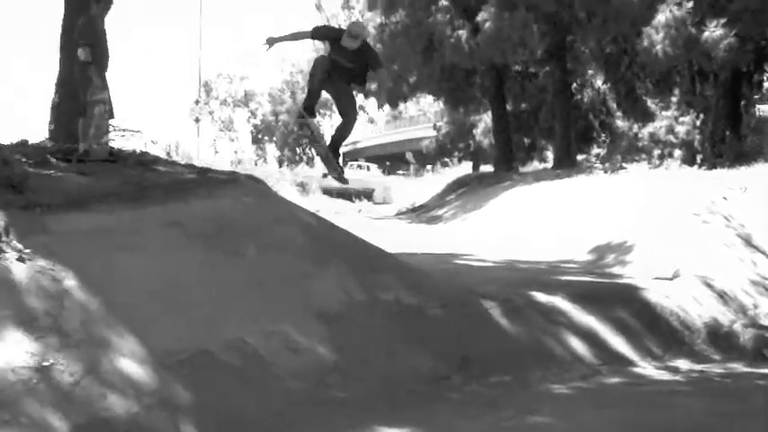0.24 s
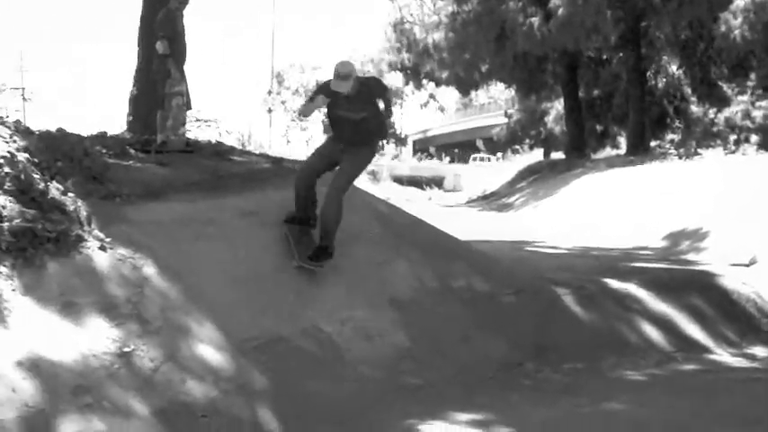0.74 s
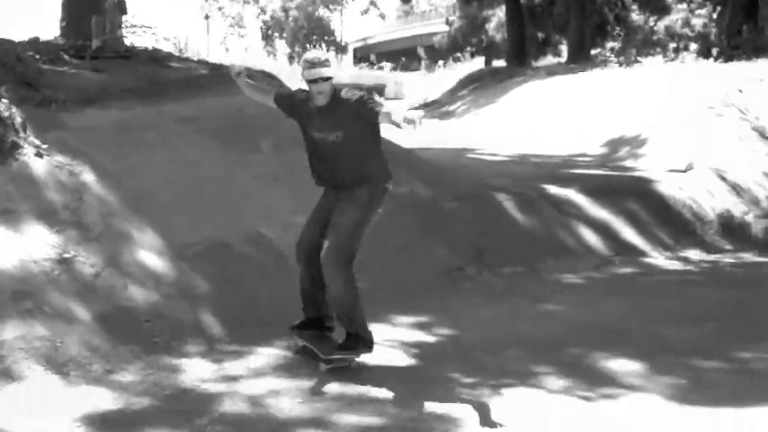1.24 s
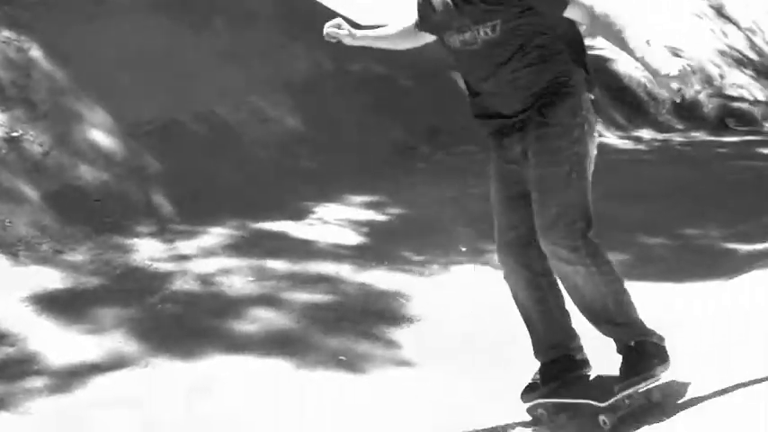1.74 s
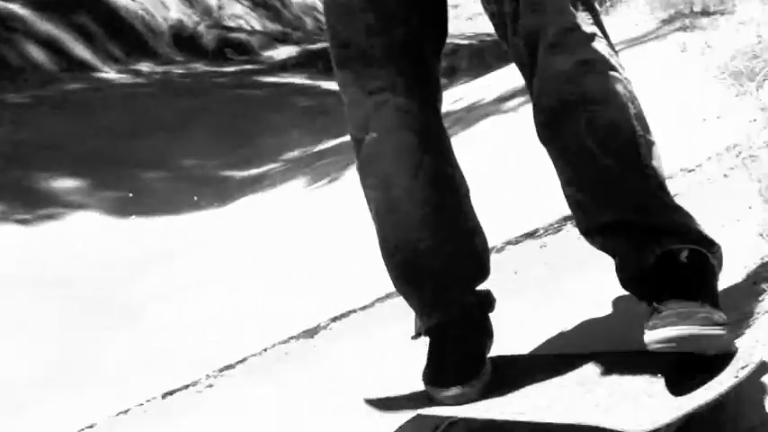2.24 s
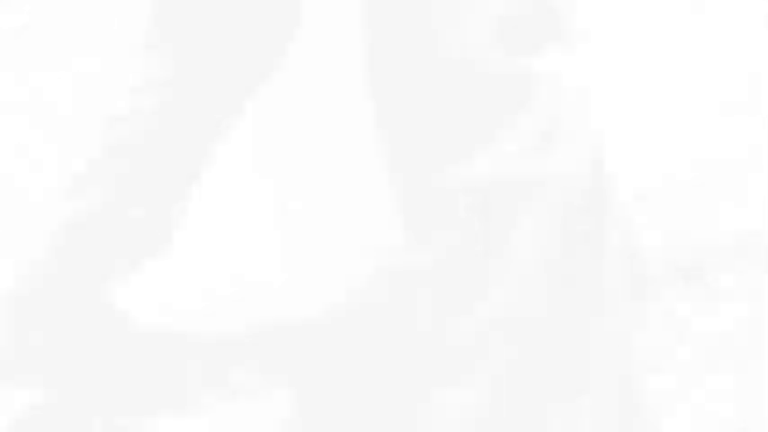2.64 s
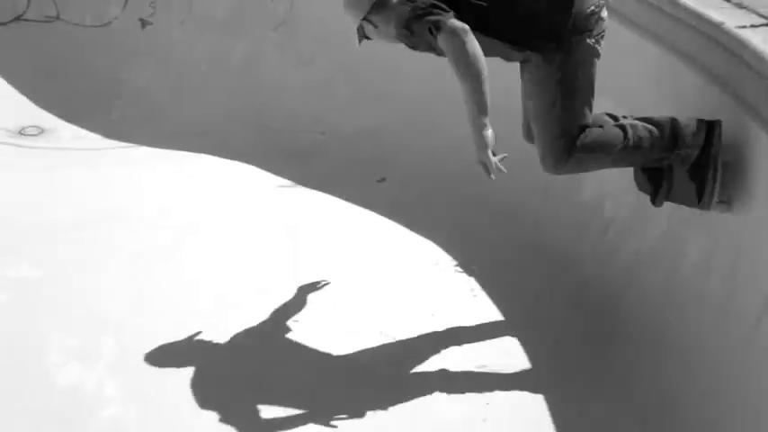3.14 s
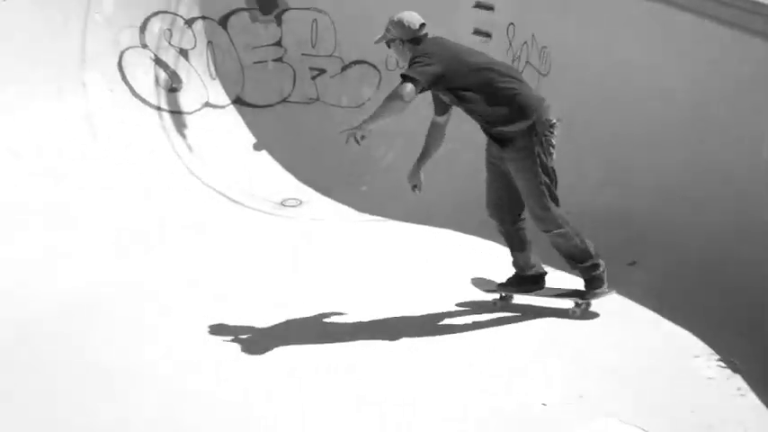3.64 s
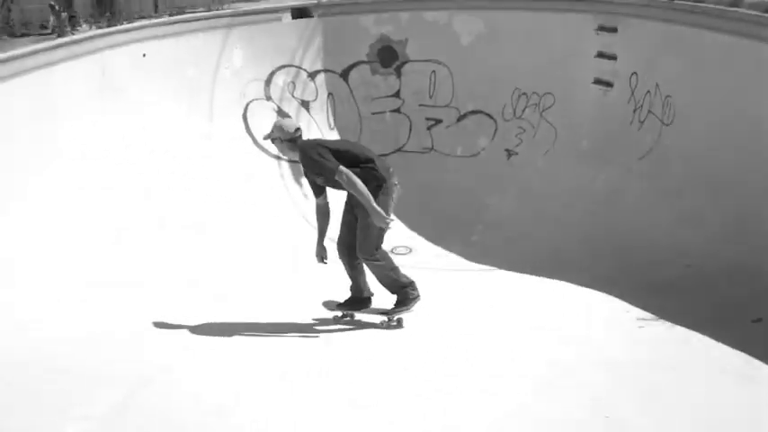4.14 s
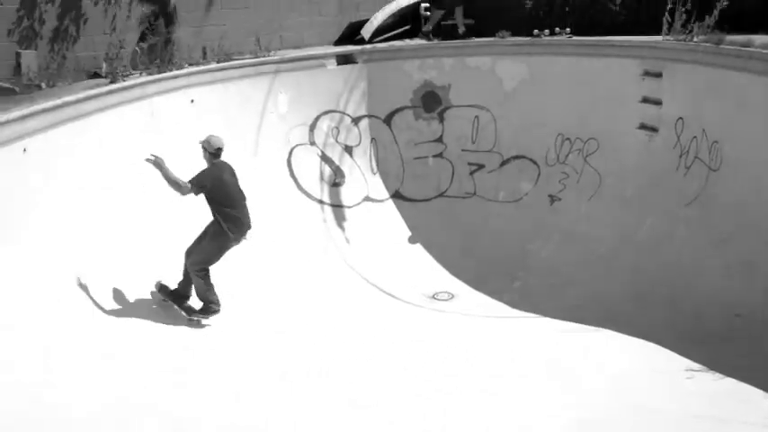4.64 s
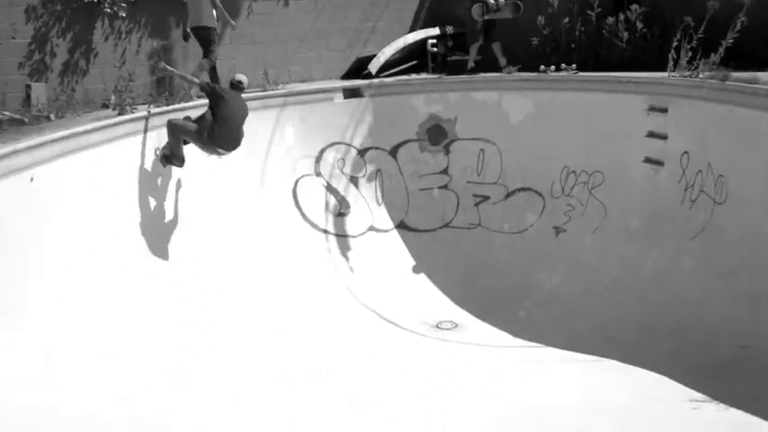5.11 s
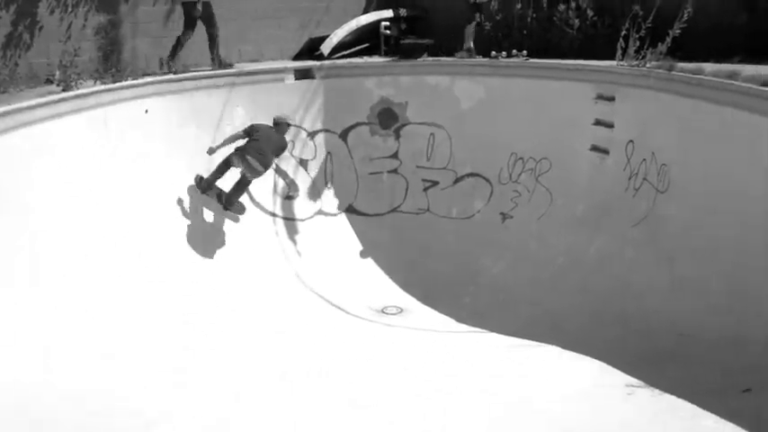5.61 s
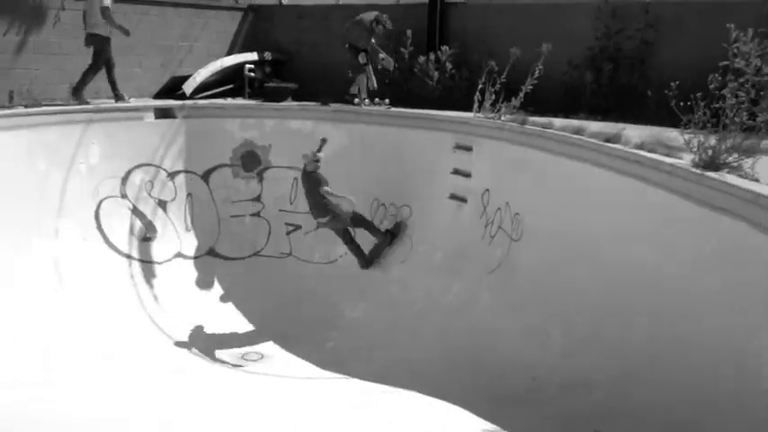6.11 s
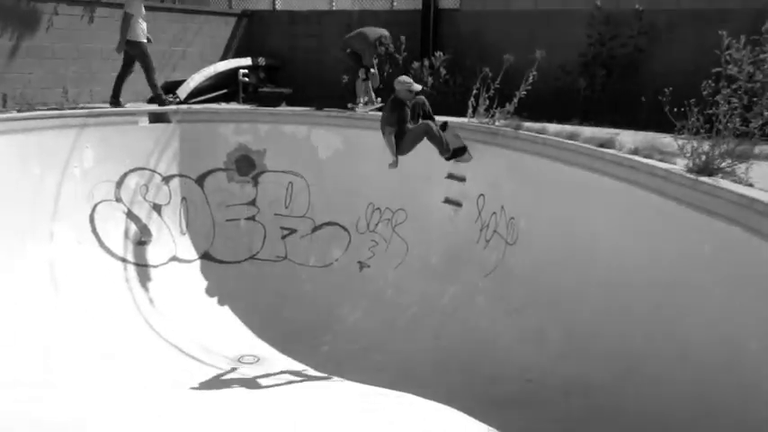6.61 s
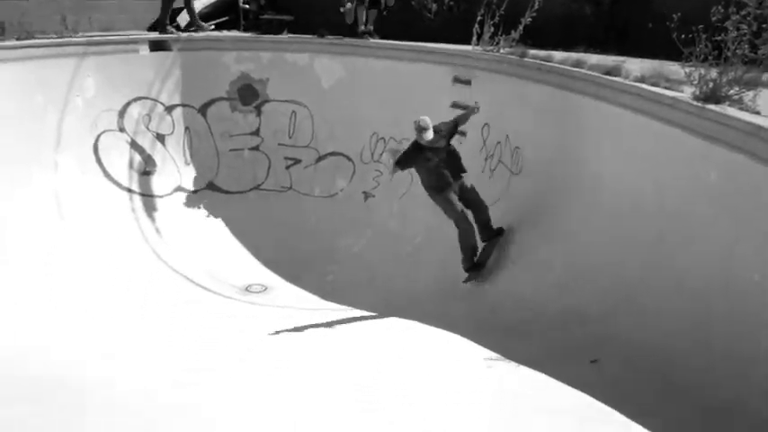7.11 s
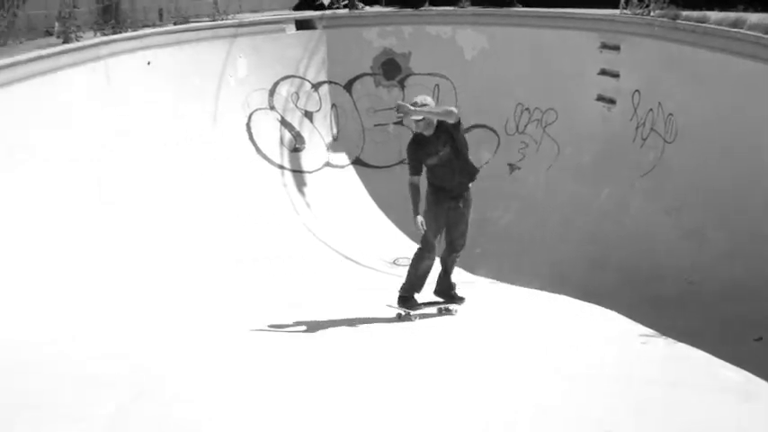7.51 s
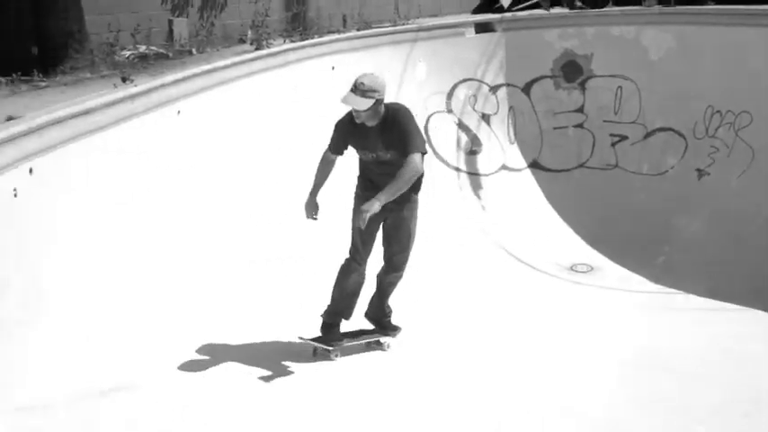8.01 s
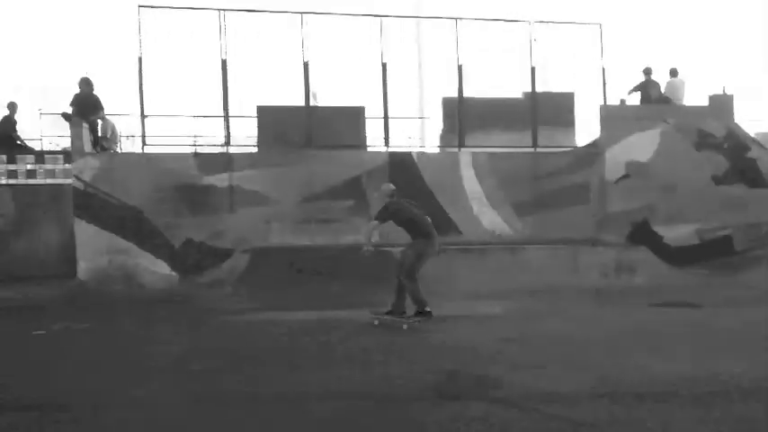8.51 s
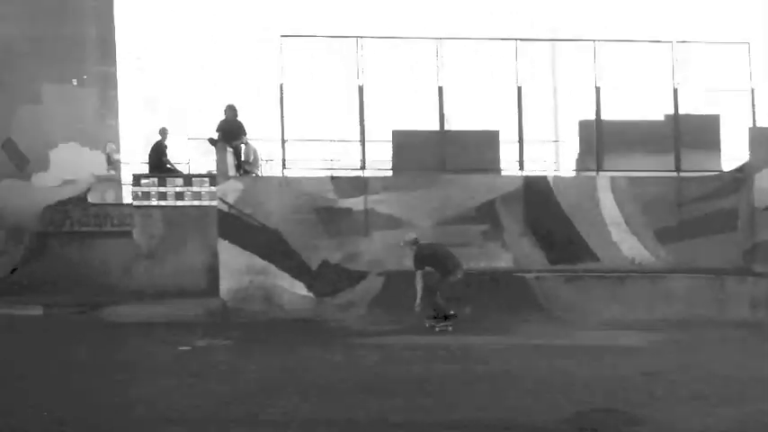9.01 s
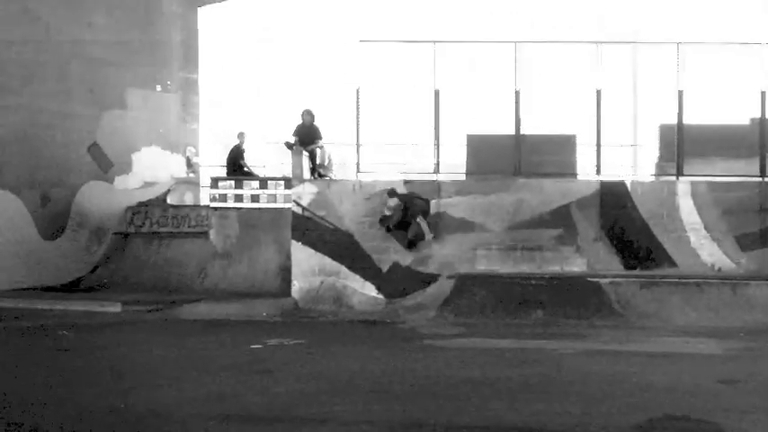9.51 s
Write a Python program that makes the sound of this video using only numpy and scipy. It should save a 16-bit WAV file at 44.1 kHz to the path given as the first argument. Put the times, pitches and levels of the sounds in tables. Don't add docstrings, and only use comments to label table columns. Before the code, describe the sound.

Close, wide stereo outdoor sound of hard wheels on concrete. First a coarse rumble with grit hiss, low wind buffeting, a loud wooden pop and clacks over seams. After a momentary dropout, a smooth hollow bowl roll surges and sings, with chattering taps, slide scrapes, a hushed float and a sharp landing. Finally the rolling turns dull and distant over open ground, with taps and a paired knock.

```python
import sys
import numpy as np
from scipy import signal
from scipy.fft import rfft, irfft, next_fast_len
from scipy.io import wavfile
from scipy.ndimage import map_coordinates

SR = 44100
rng = np.random.default_rng(int(sys.argv[2]) if len(sys.argv) > 2 else 0)


def bounce(signal):
    frames = np.transpose(np.atleast_2d(signal))
    limited = np.clip(frames, -1, 1)
    pcm = np.round(limited * 32767).astype(np.int16)
    wavfile.write(sys.argv[1], SR, pcm)


def volts(x):
    e = np.asarray(x, float) / 20
    return 10 ** e


N = 429975
STEPS = np.arange(0, N, 64)
LAYER_EDGES_HZ = 400, 950, 2600, 5300, 10000


def table(rows):
    s, *columns = np.transpose(rows)
    return np.array([np.interp(np.arange(N) / SR, s, c) for c in columns])


def fine(coarse):
    return np.interp(np.arange(N), STEPS, coarse)


def at_hz(points, hz):
    points_hz, values = np.transpose(points)
    return np.interp(np.log(hz), np.log(points_hz), values)


def rms_one(x):
    return x / np.sqrt(np.mean(x ** 2) + 1e-20)


def drift(rate_hz):
    r = np.exp(-40 * np.pi * rate_hz / SR)
    noise = rng.standard_normal(N // 20 + 4002)
    slow = signal.lfilter([1], [1, -2 * r, r * r], noise)[4000:]
    return np.interp(STEPS / 20, np.arange(len(slow)), rms_one(slow))


def swell(t, s, length_s):
    return np.exp(-((t - s) / (length_s / 2)) ** 2)


def ring(x, hz, t60_s):
    r, w = volts(-60 / (t60_s * SR)), 2 * np.pi * hz / SR
    return signal.lfilter([0, np.sin(w)], [1, -2 * r * np.cos(w), r * r], x)


def pair(mid, side, hz):
    # pitch in Hz, left-right likeness from 0 to 1.
    likeness = [(60, 0.79), (130, 1), (400, 0.97), (1000, 0.63), (2000, 0.045), (4000, 0.31), (7000, 0.049),
                (14000, 0.051)]
    alike = np.clip(at_hz(likeness, hz), 0, 1)
    return np.sqrt(.5 + alike / 2) * mid + np.sqrt(.5 - alike / 2) * side * [[1], [-1]]


def grounds():
    t = STEPS / SR
    yard_step_s = 8.6, 8.01
    yard = np.interp(t, yard_step_s, [0, 1])
    bank = t < 2.35
    return np.array([bank, (1 - yard) * ~bank, yard])


def parts_db():
    # start in seconds, deck load in dB, truck chatter in dB, nearness in dB.
    ride = [(0, -28, -33.5, -24.5), (.54, -28, -31, -24), (.95, -30.5, -35, -13.5),
            (1.27, -36.5, -32.5, 0.5), (2.1, -39, -32, 6.5), (2.46, -26.5, -30.5, -1.5),
            (2.8, -35, -37.5, 10.5), (3.1, -28, -26.5, -5.5), (3.55, -32.5, -32, 2), (3.9, -30.5, -39, -3),
            (4.3, -33.5, -36.5, -6), (5.1, -28, -36, -2), (5.8, -19, -28, -10), (6.3, -19.5, -28.5, -10),
            (7.1, -29.5, -34.5, -4.5), (7.7, -35, -38, -1.5), (8.0, -23.5, -34, -7.5),
            (9.75, -25.5, -34.5, -5.5)]
    parts = [(250, 1, 0.086, 1, 0.4), (600, 0.75, 0.36, 0.14, 0.74), (1500, 0.049, 1.08, 0.081, 0.76),
             (3700, 0.091, 1.44, 0.06, 0.51), (7500, 0.066, 0.98, 0.26, 0.47),
             (12000, 0.3, 1.03, 0.52, 0.58)]
    balance_db = [(-30, -39, -37, -47, -49.5, -45.5), (-31.5, -38, -37, -46, -46, -48.5),
                  (-29, -34.5, -35, -45, -47, -52.5)]
    # centre in seconds, length in seconds, deck gain in dB,
    # deck pitch in Hz, grit gain in dB.
    pumps = [(0.03, 0.29, 5, 250, 3.5), (1.103, 0.25, 2, 403, 1), (1.55, 0.56, -4.5, 1110, -2.5),
             (1.693, 0.17, 16, 570, 7.5), (1.846, 0.13, 4, 400, 1.5), (2.302, 0.15, 9, 330, 8),
             (2.558, 0.2, -13, 1500, -7), (2.932, 0.17, 9, 460, 4), (3.213, 0.3, -8, 1500, -2),
             (3.382, 0.08, 7, 810, 6), (4.136, 0.11, 5, 1310, 6.5), (4.562, 0.65, 9, 250, 2),
             (4.72, 0.048, 1.5, 250, 3), (4.845, 0.16, 8.5, 566, 7.5), (4.988, 0.18, 12.5, 1320, 11.5),
             (5.204, 0.11, 4.5, 910, 7.5), (5.277, 0.069, 7.5, 925, 11), (5.827, 0.11, 4.5, 1400, 4.5),
             (6.138, 0.12, 2.5, 450, 3.5), (6.414, 0.0084, 5, 900, 9.5), (6.97, 0.11, 14.5, 950, 14),
             (7.362, 0.22, 9.5, 605, 4.5), (8.485, 1, 2, 400, 2.5), (9.446, 0.45, 2.5, 250, 0.5)]
    # start in seconds, length in seconds, level in dB.
    lifts = [
        (0.634, 0.17, -8),
        (1.292, 0.14, -4),
        (5.308, 0.2, -6.5),
        (5.561, 0.092, -2),
        (6.39, 0.57, -15.5),
        (6.614, 0.31, -3),
        (1.418, 0.039, -3),
        (1.735, 0.03, -6),
        (1.785, 0.06, -6.5),
        (1.84, 0.042, -5),
    ]
    mean_load_db, pump_octaves, lift_edge_s = -33, 1.38, 0.03
    hz, *follows, hush = np.transpose(parts)
    t = STEPS / SR
    controls = table(ride) - [[mean_load_db], [mean_load_db], [0]]
    db = np.transpose(balance_db) @ grounds() + np.transpose(follows) @ controls[:, STEPS]
    for s, length_s, deck_db, deck_hz, grit_db in pumps:
        reach_db = deck_db * np.exp(-(np.log2(hz / deck_hz) / pump_octaves) ** 2)
        gain_db = np.where(hz < LAYER_EDGES_HZ[2], reach_db, grit_db)
        db += gain_db[:, None] * swell(t, s, length_s)
    for s, length_s, lift_db in lifts:
        end_s = max(length_s, lift_edge_s)
        corners_s = s + np.array([0, lift_edge_s, end_s, end_s + lift_edge_s])
        db += lift_db * hush[:, None] * np.interp(t, corners_s, [0, 1, 1, 0])
    return db


def rolling():
    # pitch in Hz, density in dB per Hz.
    bank_colour = [(130, -10.5), (220, -6), (330, -9.5), (480, -11.5), (1000, -11), (1900, -11.5),
                   (3300, -28.5), (4500, -32), (6000, -29.5), (9000, -29), (13000, -22)]
    bowl_colour = [(130, -5.5), (220, -1.5), (480, -7.5), (1000, -10), (1400, -8.5), (2200, -23),
                   (2700, -25), (3800, -34.5), (5500, -18), (7000, -16.5), (9000, -14), (13000, -18)]
    yard_colour = [(130, -16), (220, -1.5), (480, -9), (700, -9.5), (1000, -28.5), (1900, -32.5),
                   (3300, -27), (4500, -33.5), (6000, -27), (7500, -26), (13000, -37)]
    # pitch in Hz, width in Hz, level in dB.
    deck_rings = [
        [(318, 70, -6), (1054, 240, -3), (1783, 12, -14)],
        [(437, 30, -7.5), (645, 86, -5.5), (500, 84, -8), (1644, 230, -6)],
        [(505.7, 27, -6), (1290, 19, -12), (1712, 40, -12), (2620, 60, -40)],
    ]
    pebbles_per_s = 260, 120, 120
    pebbles_db = -2, -7, -16
    flutter = 1, .9, .5
    layers = volts(parts_db())
    share = grounds()
    bumps = 1.1 * drift(70) + .9 * drift(16)
    uneven = flutter @ share

    edges_hz = 75.6 * 2 ** (np.arange(24) / 3)
    centres_hz = np.sqrt(edges_hz[1:] * edges_hz[:-1])
    layer = np.searchsorted(LAYER_EDGES_HZ, centres_hz)
    colours = bank_colour, bowl_colour, yard_colour
    power = np.array([volts(2 * at_hz(c, centres_hz)) * centres_hz for c in colours])
    power /= np.array([power[:, layer == k].sum(axis=1) for k in layer]).T

    white = rng.standard_normal((2, 2, N))
    struck = rng.random(N) < fine(pebbles_per_s @ share * volts(4 * drift(12))) / SR
    sizes = volts(4 * np.minimum(rng.exponential(1, N), 3)) * rng.choice([-1, 1], N)
    white[:, 0] += rms_one(struck * sizes) * fine(volts(pebbles_db) @ share)

    out = np.zeros((2, N))
    for k, hz in enumerate(centres_hz):
        band = signal.butter(2, edges_hz[k:k + 2], "band", fs=SR, output="sos")
        mid, side = rms_one(signal.sosfilt(band, white[k % 2]))
        flicker = volts(uneven * (bumps + 2.0 * drift(8.7)))
        gain = np.sqrt(power[:, k] @ share) * layers[layer[k]] * flicker
        out += fine(gain) * pair(mid, side, hz)
    for modes, here in zip(deck_rings, share):
        for hz, width_hz, db in modes:
            mid, side = rms_one(ring(rng.standard_normal((2, N)), hz, 1.63 / width_hz))
            spells = volts(db + uneven * 3.2 * drift(18.4))
            gain = here * layers[np.searchsorted(LAYER_EDGES_HZ, hz)] * spells
            out += fine(gain) * pair(mid, side, hz)
    return out


def wind():
    # centre in seconds, length in seconds, level in dB.
    gusts = [(0, 0.22, -28), (0.256, 0.14, -41), (0.747, .2, -37), (0.456, 0.35, -34.5),
             (1.15, 0.21, -26.5), (3.2, 2.2, -48), (4.076, 0.25, -29.5), (4.45, 0.41, -31.5),
             (4.7, 0.36, -30.5), (5.85, 0.44, -50), (6.97, 0.17, -24.5), (8.397, .7, -35),
             (9.11, 0.93, -33)]
    # start in seconds, peak in dB, port (positive = left).
    puffs = [
        (0.313, -11, 1),
        (0.412, -3.5, 1),
        (0.446, 1, -1),
        (.482, -34, 1),
        (0.493, 1, -1),
        (0.531, -15, 1),
    ]
    calm_db, air_db = -48, -69
    lumps = rng.standard_normal((2, N)) * [fine(volts(4.5 * drift(10))), fine(volts(4.5 * drift(10)))]
    lumps += 0.68 * lumps[::-1]
    low = signal.butter(2, [105, 230], "band", fs=SR, output="sos")
    strength = volts(calm_db) + sum(volts(db) * swell(STEPS / SR, s, length_s) for s, length_s, db in gusts)
    out = fine(strength) * rms_one(signal.sosfilt(low, lumps))
    out += volts(air_db) * np.diff(rng.standard_normal((2, N + 1)))
    t = np.arange(1300) / SR
    puff = np.sin(2 * np.pi * 170 * t) * t / 0.0068 * np.exp(1 - t / 0.002)
    for s, db, port in puffs:
        out[int(port < 0), round(s * SR):][:1300] += volts(db) * puff
    return out


def blows(rows, rattle_s, first):
    # pitch in Hz, level in dB, t60 in seconds.
    axles = [
        (3500, 10, 0.032),
        (4000, 16.5, 0.016),
        (4280, 1, 0.011),
        (6960, 9.5, 0.018),
        (7790, 13, 0.024),
    ]
    board_hz = np.geomspace(210, 2900, 18)
    board_t60_s = .027 * (1000 / board_hz) ** .3
    focus_db, focus_t60_s = 4, .018
    soft_contact_s = .0003
    size = 2600
    out = np.zeros((2, N + size))
    t = np.arange(size) / SR
    air = signal.butter(2, [2400, 15000], "band", fs=SR, output="sos")
    envelope = np.exp(-(t / rattle_s) ** 3) * np.minimum(1, .6 + t / (.3 * rattle_s))
    give = np.hanning(round(soft_contact_s * SR) + 2)
    for s, db, crack_db, loudest_hz in rows:
        hits = rng.random((2, size)) < 3000 / SR
        contacts = hits * rng.standard_normal((2, size)) * envelope
        contacts[:, 20] = first, first * rng.uniform(-.6, .6)
        soft = signal.lfilter(give, 1, contacts)
        strength_db = -7.5 * np.abs(np.log2(board_hz / loudest_hz)) - 2 * np.log2(board_hz / 1100) ** 2
        board = [*zip(board_hz, strength_db, board_t60_s), (loudest_hz, focus_db, focus_t60_s)]
        sound = np.zeros((2, size))
        for modes, part_db, push in (board, -3.0, soft), (axles, crack_db - 7.0, contacts):
            part = np.zeros((2, size))
            for hz, mode_db, t60_s in modes:
                gain = volts(mode_db + 2 * rng.standard_normal())
                mid, side = ring(push + 1e-18, hz * rng.uniform(0.94, 1.05), t60_s)
                part += gain * pair(mid, side, hz)
            sound += volts(part_db) * part / np.abs(part).max()
        grit = signal.sosfilt(air, rng.standard_normal((2, size))) * envelope
        grit = signal.lfilter([1], [1, -.75], pair(*grit, 4000))
        at = round(s * SR)
        out[:, at:at + size] += volts(db) * (sound + volts(crack_db - 15.0) * grit)
    return out[:, :N]


def struck_board():
    # start in
    # seconds, peak in dB, crack in dB, loudest pitch in Hz.
    taps = [(0.087, -7.5, -8.5, 1050), (0.0962, -11.5, -4.5, 945), (0.603, -15, -20, 1240),
            (0.628, -14, -16, 1000), (0.633, -12.5, -7, 583), (0.662, -17, -44, 1340),
            (0.678, -17.5, -22, 1340), (0.825, -21, -38, 1340), (0.877, -14.5, -42, 1680),
            (0.906, -25, -40, 1400), (1.001, -17.5, -30, 980), (1.397, -16.5, -19, 1670),
            (1.481, -19, -8, 400), (1.559, -17.5, -20, 506), (1.6, -19, -25, 1170),
            (1.65, -24, -25, 1040), (1.663, -14, -20, 700), (1.681, -12, -25, 1500),
            (1.705, -10, -17, 900), (1.82, -19, -30, 942), (1.834, -22, -28, 1340),
            (1.846, -16.5, -33, 1730), (2.003, -12.5, -26, 1820), (2.212, -17, -23, 420),
            (2.259, -15, -25, 333),
            (2.4175, -21, -6, 900), (2.436, -15, -4, 338), (2.812, -13.5, -9, 700),
                 (2.999, -22, 1, 1500), (3.031, -19, 1, 1310), (3.102, -14.5, 1.5, 1220),
                 (3.161, -19, -6, 1500), (3.232, -27, -9, 1500), (3.261, -22, -13, 1500),
                 (3.333, -18, -4, 1500), (3.367, -16.5, -3, 1500), (3.125, -9.5, -6, 1560),
                 (3.2, -18.5, 1.5, 1500), (3.314, -10.5, -25, 1530), (3.405, -13.5, -7, 900),
                 (4.79, -23, -44, 640), (4.877, -11, -37, 700), (5.157, -14.5, -37, 810),
                 (5.278, -25, -25, 641), (5.419, -10.5, -25, 1500), (2.971, -17, 5.5, 1720),
                 (6.926, -14, -16, 1200), (6.958, -17.5, 2, 695), (8.622, -10, -34, 560),
                 (8.78, -14, -29, 519), (8.9, -14, -30, 700), (9.291, -10, -41, 600)]
    knocks = [
        (0.5825, 1, -15, 930),
        (1.773, -3, -24, 1050),
        (1.9245, -7, -18, 900),
        (1.957, -9, -18, 800),
        (3.2885, -8, -10, 1500),
        (6.506, -14, -6, 1400),
        (6.9765, -5, -25, 1400),
        (7.0045, -9, -25, 480),
        (9.597, -5.5, -22, 1100),
        (9.6135, -8, -22, 1150),
    ]
    rattles = [(0.087, -11.5, -16.5, 1410), (0.596, -10, -19, 1220), (0.622, -15, -13, 1100),
               (1.419, -12.5, -13.5, 466), (1.474, -14, -22, 298), (1.84, -15.5, -46, 1740),
               (6.929, -13.5, -11.5, 910), (2.114, -11.5, -38, 318), (2.266, -11, -43, 326),
               (2.97, -14, 4.5, 1740), (3.021, -12, -0.5, 1610), (3.183, -13, -7, 1610),
               (3.288, -12, -4, 1480), (3.345, -18.5, -0.5, 936), (4.989, -15, -24, 1460),
               (5.562, -19.5, 5, 750), (6.953, -14, -49, 450), (6.965, -11, -25, 1350),
               (3.138, -16.5, -6.5, 1430), (3.298, -16, -15, 1440), (3.32, -15.5, -16, 1440),
               (9.599, -10.5, -13.5, 1170), (9.617, -12.5, -18, 1170)]
    scrapes = [(1.661, -31.5, -34, 334), (1.71, -16, -38, 323), (2.215, -18, -37, 353),
               (5.197, -14.5, -32, 750), (5.243, -21, -19, 870), (5.277, -34, -19, 656),
               (5.517, -9.5, -10.5, 800), (5.54, -8.5, -9, 780), (6.505, -9.5, -11.5, 1360),
               (6.575, -28.5, -5, 1500), (6.94, -13, -15, 298), (9.624, -15.5, -17, 1100)]
    out = blows(knocks, rattle_s=.0055, first=3.2)
    out += blows(taps, rattle_s=.0055, first=2.2)
    out += blows(rattles, rattle_s=.013, first=1.3)
    return out + blows(scrapes, rattle_s=.028, first=.8)


def thuds():
    # start in seconds, peak in dB, pitch in Hz.
    heavy_blows = [(0.584, -15, 250), (0.634, -17, 480), (1.776, -16, 420), (1.9255, -14, 310),
                   (1.958, -14, 310), (2.436, -15, 500), (6.927, -15, 300), (6.96, -18, 330),
                   (8.623, -16, 520), (8.901, -18, 600), (5.498, -15, 810), (5.571, -13, 800)]
    t60_cycles = 6.0
    out, t = np.zeros(N), np.arange(2000) / SR
    for s, db, hz in heavy_blows:
        rise = np.minimum(1, t * hz / 0.4)
        bend = np.sin(2 * np.pi * hz * t) + 0.6 * np.sin(2 * np.pi * 1.55 * hz * t)
        out[round(s * SR):][:len(t)] += volts(db - 60 * t * hz / t60_cycles) * rise * bend
    return out


def singing():
    # centre in seconds, length in seconds, pitch in Hz, width in Hz, level in dB.
    spells = [(1.70, .11, 332, 90, -26), (3.234, 0.39, 1526, 220, -32), (5.26, .14, 6200, 710, -41),
              (5.65, .08, 5900, 700, -47), (5.951, .3, 574, 100, -25), (6.148, .15, 442, 70, -20.5),
              (8.45, 0.15, 1700, 200, -34), (8.803, 0.94, 4160, 280, -52), (1.5, .5, 4250, 370, -52.5),
              (7.356, .15, 513, 120, -31), (5.78, .25, 420, 60, -24), (6.518, .035, 2000, 250, -30),
              (5.545, .06, 1600, 400, -23), (2.979, .02, 3600, 900, -28), (3.03, .025, 3700, 900, -32),
              (3.135, .04, 3700, 1000, -36), (3.36, .05, 3600, 1000, -36), (1.848, .012, 1760, 150, -25),
              (9.525, .04, 1700, 600, -33), (6.979, .011, 1400, 250, -13), (1.7755, .007, 1050, 350, -15),
              (1.928, .008, 800, 500, -18), (9.602, .012, 1150, 300, -19), (.596, 0.0201, 246, 51, -16.5)]
    out = np.zeros((2, N))
    for s, length_s, hz, width_hz, db in spells:
        at = np.arange(round((s - length_s) * SR), min(N, round((s + length_s) * SR)))
        mid, side = rms_one(ring(rng.standard_normal((2, len(at))), hz, 5.1 / width_hz))
        out[:, at] += volts(db) * swell(at / SR, s, length_s) * pair(mid, side, hz)
    return out


def scene():
    # time in seconds, lead of the left port in samples.
    lead = [(0, 1.5), (1.5, 2), (2.3, 0.5), (2.45, 2.5), (4.5, 3), (5.2, 3), (5.7, 6), (6.7, 1.5), (7.2, 2),
            (7.7, 4.5), (8.2, -2.5), (9.2, -6.5), (9.75, 1.5)]
    board = rolling() + struck_board() + thuds() + singing()
    reading = np.arange(N) + table(lead) * [[.5], [-.5]]
    ports = [map_coordinates(x, [at], order=3, mode="nearest") for x, at in zip(board, reading)]
    return np.array(ports) + wind()


def low_pass(x):
    return signal.sosfilt(signal.butter(12, 14960, fs=SR, output="sos"), x)


def record(dry):
    # time in seconds, level in dB.
    cut_level = [
        (2.272, 0),
        (2.296, -16),
        (2.308, -60),
        (2.335, -90),
        (2.374, -90),
        (2.379, -28),
        (2.4165, -20),
        (2.4175, 0),
    ]
    cancel_lag_s, top_hz = 16.9 / 44100, 14060
    emptied, filled_second = (-2.0, 0.8, 0.65), (4.3, 0.95, 2.9)
    size = next_fast_len(N + 1000)
    hz = np.fft.rfftfreq(size, 1 / SR)
    turns = hz * cancel_lag_s
    delay, passed = np.exp(-2j * np.pi * turns), hz < top_hz

    def heard(spectrum):
        return irfft(spectrum, size)[:N]

    both = rfft(dry[0] + dry[1], size) * passed / 2
    apart = rfft(dry[0] - dry[1], size) * passed / 2
    apart *= (1 + .93 * delay) * np.where(hz > 3200, .83, 1.1)
    notched = both * (1 - .97 * delay)
    mid, side = heard(notched), heard(apart)

    share = grounds()
    near = np.abs(turns - 1) < .1
    mid -= fine(np.clip(3 * drift(12) + emptied @ share, 0, 1)) * heard(notched * near)
    for k in range(1, 6):
        often = filled_second @ share if k == 1 else 4
        filled = fine(np.clip(4 * drift(12) + often, 0, 1))
        near = np.abs(turns - k - 1) < .2
        mid += filled * heard(.7 * both * near)
        near = np.abs(turns - k - 1) < .1
        mid -= (1 - filled) * heard(notched * near)
        near = np.abs(turns - k + .5) < .03 + .035 * k
        side -= fine(np.clip(3 * drift(12) + 2.4, 0, 1)) * heard(apart * near)

    wide = np.array([mid + side, mid - side]) * volts(table(cut_level))
    wide = signal.sosfilt(signal.butter(1, 110, "high", fs=SR, output="sos"), wide)
    wide = np.clip(wide, -1.2, 1.2)
    return low_pass(wide)


dry = scene()
out = record(dry)
bounce(out)
```